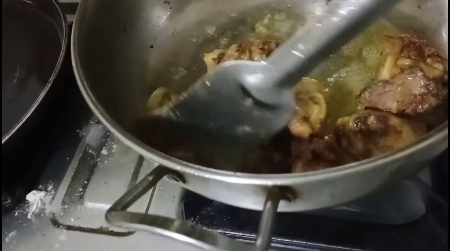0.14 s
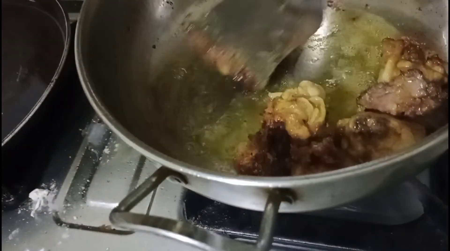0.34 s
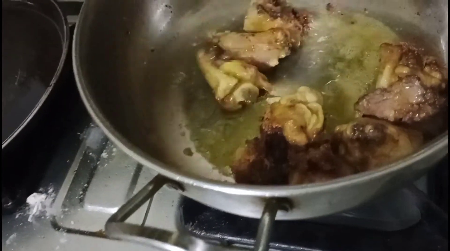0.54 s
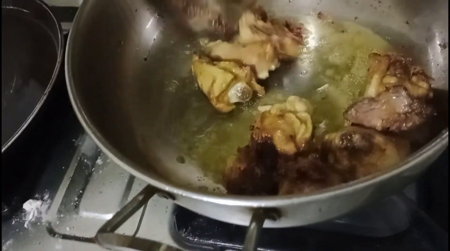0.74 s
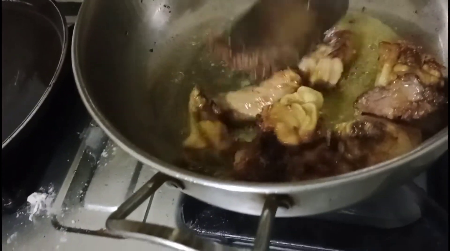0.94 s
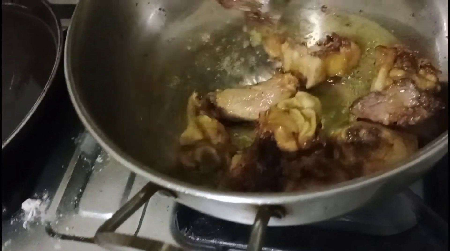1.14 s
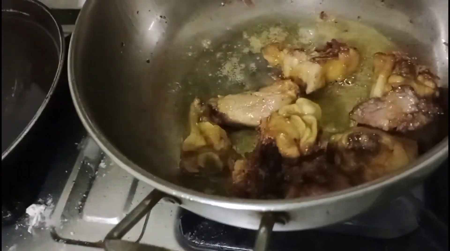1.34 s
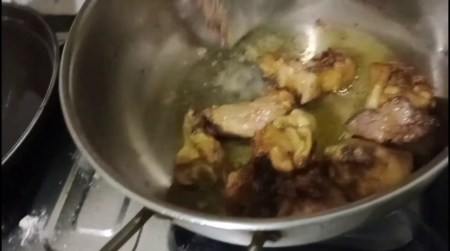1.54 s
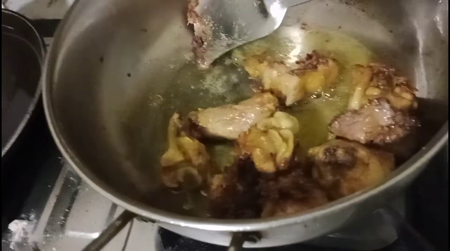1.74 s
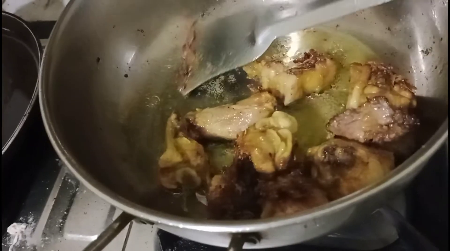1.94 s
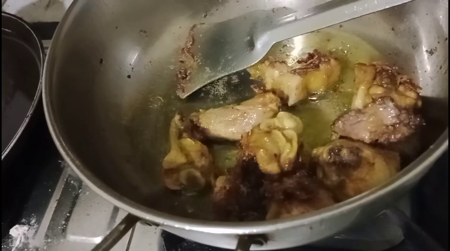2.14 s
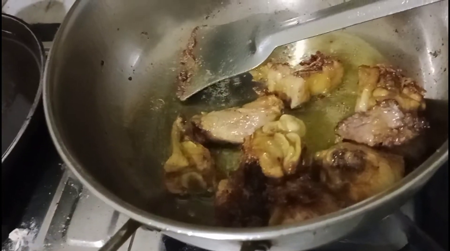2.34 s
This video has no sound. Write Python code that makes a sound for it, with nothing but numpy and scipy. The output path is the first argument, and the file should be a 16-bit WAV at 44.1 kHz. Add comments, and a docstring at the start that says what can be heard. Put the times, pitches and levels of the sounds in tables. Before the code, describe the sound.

Dense, bright sizzling of meat in hot oil runs throughout, with tiny bubbles, dull water spits and sharp oil ticks. A metal spatula taps and rasps the steel pan around 0.2 s, then gives a hard ringing double clank near 0.73 s. Meat lands softly at 0.86 s. Lighter clicks come at 1.65 and 1.82 s, the latter with a faint scrape. Close stereo, small kitchen, low rumble and hum.

```python
"""Chicken sizzles in hot oil in a steel pan, close to a microphone pair in a small kitchen.
Tiny steam bursts are filtered random impulses; bubbles are short, slightly rising rings.
Water spits dully, oil films tick; a metal spatula knocks (filtered clicks, decaying modes) and scrapes,
and meat drops softly once. Filtered noise rumbles under a wavering hum.
A look-ahead limiter ducks the sizzle around the hardest knocks.
"""
import sys
import numpy as np
from scipy import signal
from scipy.fft import rfft, irfft
from scipy.io import wavfile
from scipy.ndimage import uniform_filter1d

SR = 44100
rng = np.random.default_rng(int(sys.argv[2]) if len(sys.argv) > 2 else 0)


def output_pcm(signal):
    """Save a mono or channel-first signal as 16-bit PCM at the path in sys.argv[1].

    Samples are clipped to [-1, 1] before scaling.
    """
    pcm = np.clip(np.atleast_2d(signal).T, -1, 1) * 32767
    wavfile.write(sys.argv[1], SR, np.round(pcm).astype(np.int16))


N = 110250  # samples, 2.5 s


def amp(db):
    """Decibels to gain."""
    return 10 ** (np.asarray(db) / 20)


def evened(x):
    """Scales to rms 1."""
    return x / np.sqrt(np.mean(x ** 2) + 1e-20)


def decay(t, t60_s):
    """Exponential decay, 60 dB down at t60_s."""
    return np.exp(-np.log(1000) * t / t60_s)


def read(points, hz):
    """Reads a table on a log-frequency axis."""
    table_hz, value = np.transpose(points)
    return np.interp(np.log(hz + 1), np.log(table_hz), value)


def level(points):
    """Gain over time from rows of seconds and dB."""
    return amp(np.interp(np.arange(N) / SR, *np.transpose(points)))


def add(mix, start_s, sound):
    """Adds a stereo sound at start_s."""
    part = mix[:, max(round(start_s * SR), 0):][:, :sound.shape[-1]]
    part += sound[..., :part.shape[1]]


def convolve(a, b):
    """Convolution along time, no longer than the scene."""
    return signal.fftconvolve(np.atleast_2d(a), np.atleast_2d(b), axes=1)[:, :N]


def click(colour, size=4096):
    """A causal (minimum-phase) click of unit energy with the given colour."""
    hz = abs(np.fft.fftfreq(size, 1 / SR))
    log_gain = np.log(amp(read(colour, hz)))
    spectrum = np.exp(np.conj(signal.hilbert(log_gain)))
    pulse = np.fft.ifft(spectrum).real[:size // 2]
    return pulse / np.linalg.norm(pulse)


BOWL_T60_S, BOWL_DB, ROOM_T60_S, ROOM_DB = 0.021, 3, 0.23, -7.5  # dB re direct sound


def space(bowl_db, room_db):
    """Path from one spot in the pan to both ports: direct, quick echoes off the steel, kitchen."""
    t = np.arange(SR // 2) / SR
    path = np.zeros((2, len(t)))
    path[[0, 1], rng.integers(0, 7, 2)] = 1  # direct sound, 0-6 samples late
    for db, t60_s, density in ((bowl_db, BOWL_T60_S, .2), (room_db, ROOM_T60_S, .08)):
        sparse = rng.random(path.shape) < density
        taps = rng.standard_normal(path.shape) * sparse * decay(t, t60_s)
        path = path + amp(db) * taps / np.linalg.norm(taps, axis=1, keepdims=True)
    return path / np.sqrt(np.sum(path ** 2) / 2)


def open_air():
    """Path from the surface of the oil: more direct, weaker echoes off the steel."""
    return space(bowl_db=-2, room_db=-6)


def bursts(per_s, spread_db, largest):
    """Random impulses, many small and a few large; largest caps the size in units of spread_db."""
    hits = rng.random(N) < per_s / SR
    size_db = spread_db * np.minimum(rng.exponential(1, N), largest)
    return hits * amp(size_db) * rng.choice([-1, 1], N)


# Colour of the sizzle. Each row: frequency in Hz, relative level in dB per Hz.
SIZZLE_COLOUR = [(100, -56), (300, -31.5), (600, -8.5), (900, -14.5), (1400, -8.5), (2400, -5), (4000, 1),
                 (5500, 0.5), (7600, 0), (9000, -6.5), (10200, -18), (12000, -29), (15500, -37.5)]
SIZZLE_DB, PAN_BUZZ_DB = -26, -53  # rms before the heat curve
BURSTS_PER_S, BURST_SPREAD_DB, FLURRY_RMS_DB = 2400, 3.2, 1.2


def sizzle(count=10):
    """Steam bursts come in flurries at many spots in the oil; they also set the pan ringing faintly."""
    wander = evened(uniform_filter1d(rng.standard_normal(N), size=600))
    flurries = amp(FLURRY_RMS_DB * wander)
    spots = [flurries * bursts(BURSTS_PER_S / count, BURST_SPREAD_DB, largest=3.8) for _ in range(count)]
    placed = sum(convolve(spot, space(BOWL_DB, ROOM_DB)) for spot in spots)
    crackle = evened(convolve(placed, click(SIZZLE_COLOUR)))
    buzz = evened(convolve(sum(spots), pan_ring()))
    return amp(SIZZLE_DB) * crackle + amp(PAN_BUZZ_DB) * buzz


BUBBLE_PEAK_CYCLES, BUBBLE_GLIDE, FILM_SNAP_GAIN = 1.9, .06, .7


def bubble(hz):
    """The film snaps and the cavity rings for a few cycles, rising slightly."""
    t = np.arange(SR // 40) / SR
    age = hz * t / BUBBLE_PEAK_CYCLES
    envelope = age * np.exp(1 - age)
    glide = 1 + BUBBLE_GLIDE * (np.tanh(age / 2) - .5)
    ring = envelope * np.sin(2 * np.pi * hz * t * glide)
    return ring + FILM_SNAP_GAIN * click(SIZZLE_COLOUR)[:len(t)]


BUBBLES_DB, BUBBLES_PER_S, BUBBLE_SPREAD_DB = -29.8, 650, 5.5  # rms before the heat curve
BUBBLE_MEDIAN_HZ, BUBBLE_SPREAD_OCTAVES, BUBBLE_MAX_HZ = 4460, 0.364, 8500


def bubbling(count=48):
    """Small bubbles of many sizes, their pitches spread in a bell around the typical one."""
    share = (np.arange(count) + rng.uniform(.2, .8, count)) / count
    octaves = BUBBLE_SPREAD_OCTAVES * np.log(share / (1 - share)) / 2  # logistic quantiles
    pitches_hz = np.minimum(BUBBLE_MEDIAN_HZ * 2 ** octaves, BUBBLE_MAX_HZ)
    out = np.zeros((2, N))
    for hz in pitches_hz:
        train = bursts(BUBBLES_PER_S / count, BUBBLE_SPREAD_DB, largest=2.5)
        out += np.sqrt(hz) * convolve(convolve(train, bubble(hz)), open_air())
    return amp(BUBBLES_DB) * evened(out)


# Largest bubbles. Each row: start in seconds, relative level in dB, pitch in Hz, left-right in dB.
LARGE_BUBBLES = [(0.1752, -9, 4700, -1), (0.238, -6, 4050, 8), (0.382, -9, 4160, 5), (0.608, -9, 3900, 4),
                 (0.644, -12, 2040, 0.5), (1.014, -14.5, 2500, -2), (1.1857, -8, 3930, 3),
                 (1.4633, -13, 2520, -6), (1.521, -12, 4800, -1), (1.608, -12, 4200, -0.5),
                 (1.7307, -11, 4230, 7), (1.7836, -10.5, 4180, 11), (1.916, -8.5, 4800, -2),
                 (2.0268, -13.5, 4180, -9), (2.078, -8, 3860, -8), (2.1183, -9, 4170, 1),
                 (2.1362, -17, 2253, 11), (2.237, -7, 4600, -3), (2.2705, -6.5, 5300, -5),
                 (2.3289, -5, 5430, 0), (2.3406, -10, 3400, -3), (2.393, -12.5, 2810, -3),
                 (2.478, -11.5, 4060, -8)]
POP_DB = -1.5  # added to each row


def pops():
    """Single large bubbles that stand out of the sizzle."""
    out = np.zeros((2, N))
    for start_s, db, hz, pan_db in LARGE_BUBBLES:
        side_db = np.array([[pan_db], [-pan_db]]) / 2
        add(out, start_s, amp(POP_DB + db + side_db) * convolve(bubble(hz), open_air()))
    return out


# Loud spits of water under the meat. Each row: start in seconds, relative level in dB.
LOUD_SPITS = [(0.237, -17.5), (0.296, -23), (0.608, -20), (0.644, -17), (1.015, -18), (1.035, -23),
              (1.211, -23), (1.233, -19), (1.286, -22), (1.258, -21), (1.415, -21), (1.464, -13.5),
              (1.524, -22), (1.572, -21), (1.607, -21), (1.745, -18), (2.137, -14), (2.168, -21),
              (2.237, -21), (2.25, -15.5), (2.392, -16)]
# Level of the small spits. Each row: time in seconds, relative level in dB.
SMALL_SPIT_LEVEL = [(0, -3.5), (.15, -3), (.28, -1), (.43, -8), (.62, 0), (.8, -9), (.98, 1), (1.15, -.5),
                    (1.55, 1), (2.0, .5), (2.25, -.5), (2.5, -6)]
# Colour of a spit. Each row: frequency in Hz, relative level in dB per Hz.
SPIT_COLOUR = [(150, -31), (400, -9.5), (650, 3), (1000, -7), (1500, 0), (2300, 4), (3000, 5),
               (4500, -17.5), (9000, -27), (15000, -68)]
LOUD_SPIT_DB, SMALL_SPITS_DB, SMALL_SPITS_PER_S = 11.5, -37, 130  # levels before table and colour


def spitting(count=6):
    """Drops of water burst with a dull snap: a few loud ones among many faint ones."""
    small = np.zeros((2, N))
    for _ in range(count):
        train = bursts(SMALL_SPITS_PER_S / count, spread_db=3.5, largest=2.3)
        small += convolve(train, open_air())
    out = amp(SMALL_SPITS_DB) * level(SMALL_SPIT_LEVEL) * evened(small)
    for start_s, db in LOUD_SPITS:
        add(out, start_s, amp(LOUD_SPIT_DB + db) * space(bowl_db=-3.5, room_db=-12.5))
    return convolve(out, click(SPIT_COLOUR))


# Bursting oil films. Each row: start in seconds, relative level in dB.
FILM_TICKS = [(0.341, -15.5), (0.607, -26), (0.64, -17), (0.646, -16), (0.704, -13.5), (0.919, -15.5),
              (1.503, -16), (1.531, -14), (1.864, -23), (2.025, -27), (2.045, -15), (2.064, -19.5),
              (2.153, -22), (2.237, -30), (2.27, -22), (2.318, -10.5), (2.392, -18)]
# Colour of a tick. Each row: frequency in Hz, relative level in dB per Hz.
TICK_COLOUR = [(500, -39), (2000, -18), (4500, -7), (7500, 9), (9000, 1), (10500, -22), (15000, -35)]
TICK_DB = 15  # added to each row


def ticks():
    """Oil films burst as bright single snaps above the sizzle."""
    out = np.zeros((2, N))
    for start_s, db in FILM_TICKS:
        add(out, start_s, amp(TICK_DB + db) * space(bowl_db=3, room_db=-4))
    return convolve(out, click(TICK_COLOUR))


# Spatula contacts, and meat dropped softly on the pan at 0.859 s. Each row: start in seconds,
# thud, clank and pan ring as relative levels in dB, centre of the clank in Hz,
# share of the ring time left by meat and blade.
CONTACTS = [(0.193, -13.5, -13, -15, 6500, 0.17), (0.1995, -11.5, -13, -15, 6500, 0.68),
            (0.208, -14.5, -13, -16, 6460, 0.49), (0.7319, 2.5, 2.5, -5.5, 6340, 0.9),
            (0.7431, -3, -2.5, -17, 5530, 1), (0.859, -18, -9.5, -32, 1700, 0.87),
            (1.648, -7.5, 1.5, -13, 2960, 0.13), (1.824, -13.5, -0.5, -21.5, 3580, 0.78),
            (1.8292, -14.5, 1, -20, 8000, 0.71)]
# Colour of a blow on the pan. Each row: frequency in Hz, relative level in dB per Hz.
THUD_COLOUR = [(25, -65), (70, -20), (150, -18), (270, -5), (400, -9.5), (550, 4), (750, -1.5), (900, -1.5),
               (1180, 3), (1550, -6.5), (2300, -29), (5000, -41), (15000, -62)]
THUD_DB, CLANK_DB, RING_DB, BOOM_DB = 14, 9.5, -14, -2  # added to each row
BOOM_DB_PER_THUD_DB = 0.14


def knocks():
    """Each contact, by spatula or meat, sums a thud, a clank, a pan ring and a boom in the kitchen."""
    out = np.zeros((2, N))
    for start_s, thud_db, clank_db, ring_db, centre_hz, free in CONTACTS:
        thud = convolve(click(THUD_COLOUR), space(bowl_db=-3, room_db=-7))
        clank = convolve(blade(centre_hz), space(bowl_db=5, room_db=-1))
        add(out, start_s, amp(THUD_DB + thud_db) * thud)
        add(out, start_s, amp(CLANK_DB + clank_db) * clank)
        add(out, start_s, amp(RING_DB + ring_db) * pan_ring(free))
        add(out, start_s, amp(BOOM_DB + BOOM_DB_PER_THUD_DB * thud_db) * boom())
    return out


# Modes of the pan. Each row: frequency in Hz, relative level in dB, undamped t60 in seconds.
PAN_MODES = [(181.1, -23, 1.37), (273, -12, .2), (386, -8, 0.26), (443, -11, 0.39), (531.6, -11.5, 0.5),
             (646, -5.5, 0.18), (738, -9.5, 0.43), (850, -14, 0.13), (1030, -6, 0.13), (1149, 1.5, 0.25),
             (1284, -9.5, 0.076), (1730, -12, 0.26), (5180, 1, 0.12), (6900, -7, .12)]


def pan_ring(free=1):
    """Steel pan modes as each port hears them; what rests on the steel shortens the ring."""
    t = np.arange(SR) / SR
    out = np.zeros((2, SR))
    for k, (hz, db, t60_s) in enumerate(PAN_MODES):
        phase_cycles = 0.1 * (rng.random((2, 1)) - .5)
        mode = np.sin(2 * np.pi * (hz * t + phase_cycles))
        out += (-1) ** k * amp(db) * decay(t, t60_s * free) * mode
    return out


# Modes of the blade. Each row: frequency in Hz, relative level in dB, t60 in seconds.
BLADE_MODES = [(1950, -4, 0.053), (2840, 2.5, 0.046), (3870, 4, 0.018), (5790, 1, .045), (6295, 6, 0.042),
               (6920, 1.5, 0.038), (7650, 0, 0.058), (8530, 2.5, 0.036), (8950, -3, 0.092)]
BLADE_CLICK_DB, BLADE_RING_DB = -3, -4


def blade(centre_hz):
    """The click of a contact and the short ring that it excites in the blade."""
    blow = snap(centre_hz)
    t = np.arange(len(blow)) / SR
    modes = sum(amp(db) * decay(t, t60_s) * np.cos(2 * np.pi * hz * t) for hz, db, t60_s in BLADE_MODES)
    ring = convolve(blow, modes)[0, :len(t)]
    return amp(BLADE_CLICK_DB) * blow + amp(BLADE_RING_DB) * ring / np.linalg.norm(ring)


# Colour of the blade before focus. Each row: frequency in Hz, relative level in dB per Hz.
CLANK_COLOUR = [(30, -52), (200, 14), (1000, -4), (2000, 3), (3000, -4.5), (4600, 2), (5600, 3.5),
                (6300, 1), (7000, 3.5), (9000, 0), (10500, -13), (15000, -29)]
FOCUS_DB_PER_OCTAVE = 10


def snap(centre_hz):
    """A click on the blade, focused around a frequency set by the way it touches."""
    focused = [(hz, db - FOCUS_DB_PER_OCTAVE * abs(np.log2(hz / centre_hz))) for hz, db in CLANK_COLOUR]
    return click(focused)


# Reverberation after a knock. Each row: frequency in Hz, relative level in dB per Hz.
BOOM_COLOUR = [(40, -24), (100, -4.5), (180, -2.5), (330, 0.5), (500, 6.5), (1100, 2.5), (2000, -11),
               (6000, -43)]
BOOM_T60_S, BOOM_RISE_S = 1.0, 0.012


def boom():
    """Diffuse low reverberation of the kitchen that builds up and dies away."""
    t = np.arange(SR) / SR
    envelope = (1 - np.exp(-t / BOOM_RISE_S)) * decay(t, BOOM_T60_S)
    tail = rng.standard_normal((2, SR)) * envelope
    return convolve(tail / np.linalg.norm(tail[0]), click(BOOM_COLOUR))


# Blade and meat sliding on steel. Each row: start in seconds, length in seconds, level in dB, centre in Hz.
SLIDES = [(0.222, 0.074, -22.5, 3900), (0.897, 0.13, -36, 890), (1.809, 0.12, -27, 7100),
          (1.828, 0.16, -34, 630)]


def scrapes():
    """Sliding rasps on the steel: dense random slips under a smooth stroke."""
    out = np.zeros((2, N))
    for start_s, length_s, db, centre_hz in SLIDES:
        slips = evened(bursts(per_s=2500, spread_db=2, largest=3))[:int(length_s * SR)]
        stroke = slips * np.hanning(len(slips))
        rasp = convolve(stroke, snap(centre_hz))
        add(out, start_s, amp(db) * convolve(rasp, space(BOWL_DB, ROOM_DB)))
    return out


# Low background. Each row: frequency in Hz, relative level in dB per Hz.
RUMBLE_COLOUR = [(20, -25), (40, -11), (70, -6.5), (115, 3), (200, 1), (320, -3.5), (800, -24), (3000, -27)]
# Level of the hum. Each row: time in seconds, level in dB re HUM_DB.
HUM_CURVE = [(0, -3), (0.7, -5), (1.1, 1.5), (2.5, -0.5)]
RUMBLE_DB, HUM_DB, HUM_MEAN_HZ, HUM_WAVER = -55, -58.5, 225, 0.012  # waver: rms share of pitch


def kitchen():
    """Low noise rumble and a faint hum of wavering pitch."""
    rumble = evened(convolve(rng.standard_normal((2, N)), click(RUMBLE_COLOUR)))
    waver = evened(uniform_filter1d(rng.standard_normal(N), size=3000))
    hum_hz = HUM_MEAN_HZ * (1 + HUM_WAVER * waver)
    hum = evened(np.sin(2 * np.pi * np.cumsum(hum_hz) / SR))
    return amp(RUMBLE_DB) * rumble + amp(HUM_DB) * level(HUM_CURVE) * hum


# Strength of the frying. Each row: time in seconds, relative level in dB.
HEAT_CURVE = [(0, -1), (.22, -1), (.42, 0), (.52, 1.5), (.7, 0.5), (.81, -3), (.95, 0), (1.5, 0),
              (1.7, -2.5), (2.0, -1), (2.05, 0), (2.18, -2), (2.38, 0), (2.5, -2)]


def scene():
    """Frying, spatula, meat and kitchen together."""
    frying = level(HEAT_CURVE) * (sizzle() + bubbling())
    handling = knocks() + scrapes()
    return frying + pops() + spitting() + ticks() + handling + kitchen()


# Unlike colour of the two ports. Each row: frequency in Hz, left-right in dB.
PORT_BALANCE = [(100, 0.5), (450, -0.5), (650, -3.5), (1300, -0.5), (3200, -1.5), (5000, -0.5), (7400, 4.5),
                (8200, -2.5), (9000, -7), (10500, -10), (12000, -3), (15000, -1)]
# Stereo width. Each row: frequency in Hz, gain of the left-right difference.
DIFFERENCE_GAIN = [(60, 0.3), (250, 0.42), (500, .6), (1000, 1.23), (2000, 1.12), (15000, 0.84)]
LIMIT_DB, LIMIT_DB_PER_DB, LOOK_AHEAD_S = -14, 0.78, .017
PEAK_FALL_DB_PER_S, EDGE_HZ = 56, 15400  # fall of the held level, before the limiter slope


def record(dry):
    """Two ports of unlike colour, a look-ahead limiter, soft overload and the band limit."""
    hz = np.fft.rfftfreq(2 * N, 1 / SR)
    left, right = rfft(dry, 2 * N)
    mid = (left + right) / 2
    side = (left - right) / 2 * read(DIFFERENCE_GAIN, hz)
    tilt_db = read(PORT_BALANCE, hz) / 2
    ports = np.array([(mid + side) * amp(tilt_db), (mid - side) * amp(-tilt_db)])
    x = irfft(ports)[:, :N]

    power = uniform_filter1d((x ** 2).mean(0), size=500)
    power_db = 10 * np.log10(abs(power) + 1e-12)
    fall_db = np.arange(N) / SR * PEAK_FALL_DB_PER_S
    held_db = np.maximum.accumulate(power_db + fall_db) - fall_db
    over_db = uniform_filter1d(np.maximum(held_db - LIMIT_DB, 0), size=300)
    ahead_db = np.interp(np.arange(N) + LOOK_AHEAD_S * SR, np.arange(N), over_db)
    x = np.tanh(x * amp(-LIMIT_DB_PER_DB * ahead_db))

    lowpass = signal.firwin(511, EDGE_HZ, window=("kaiser", 9), fs=SR)
    return signal.oaconvolve(x, lowpass[None], "same")


dry = scene()
out = record(dry)
output_pcm(out)
```